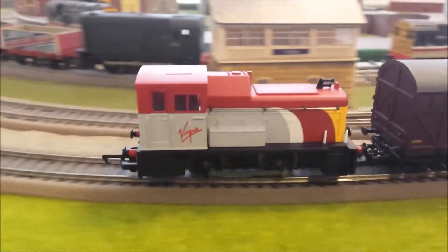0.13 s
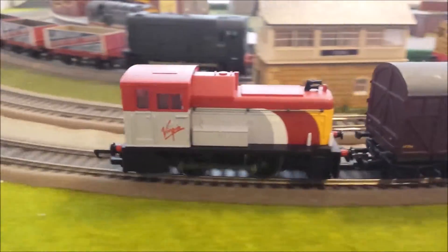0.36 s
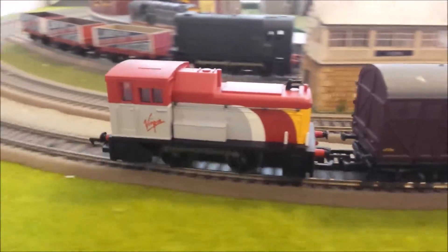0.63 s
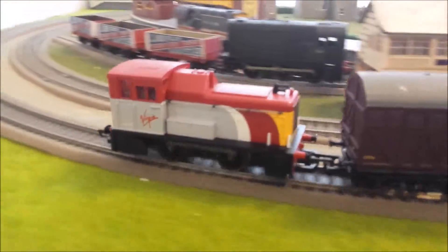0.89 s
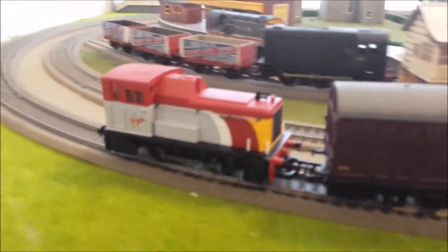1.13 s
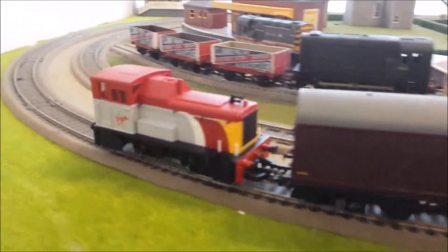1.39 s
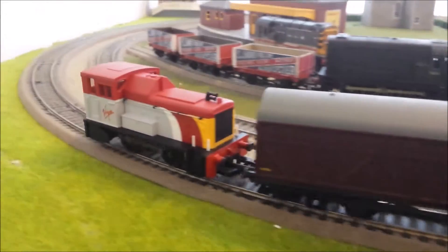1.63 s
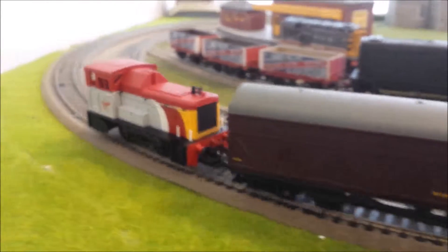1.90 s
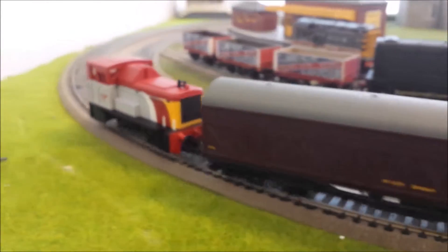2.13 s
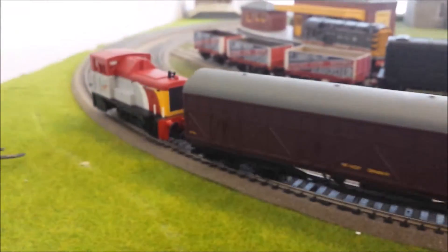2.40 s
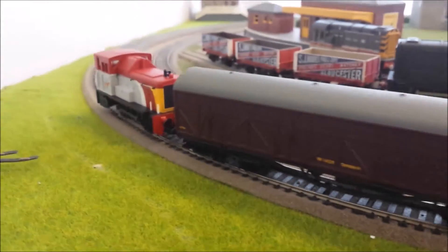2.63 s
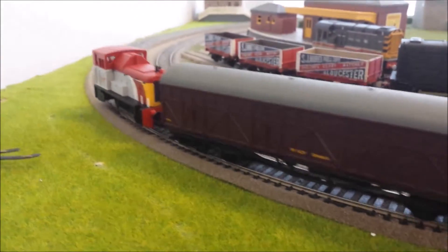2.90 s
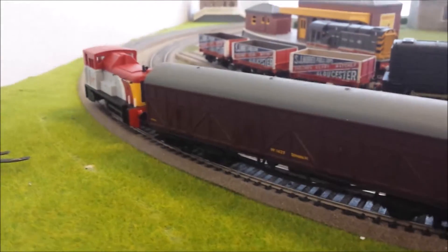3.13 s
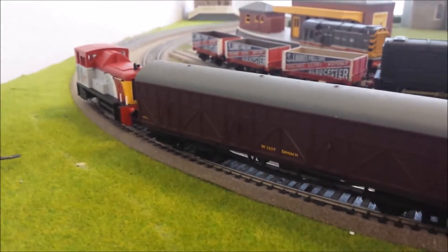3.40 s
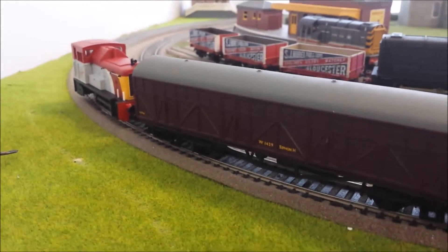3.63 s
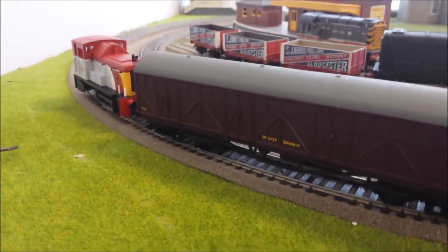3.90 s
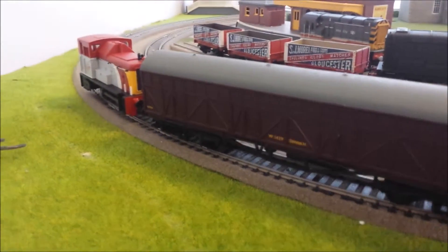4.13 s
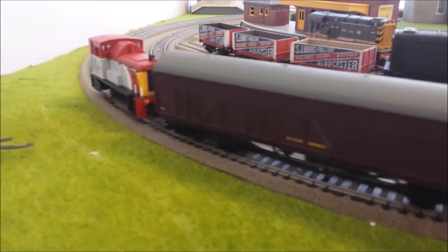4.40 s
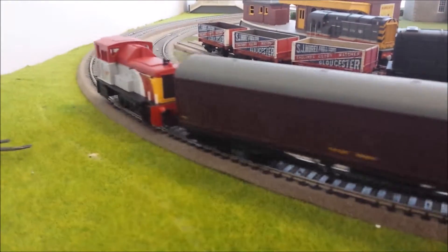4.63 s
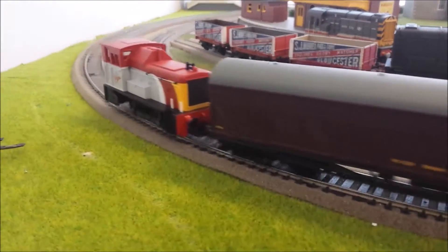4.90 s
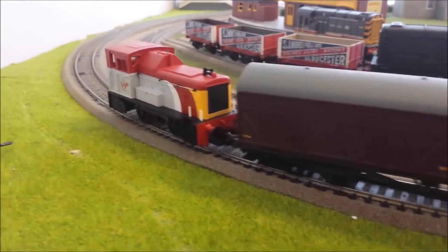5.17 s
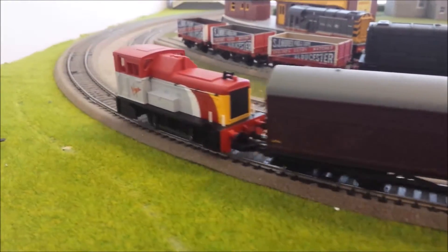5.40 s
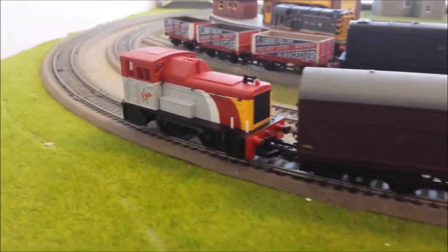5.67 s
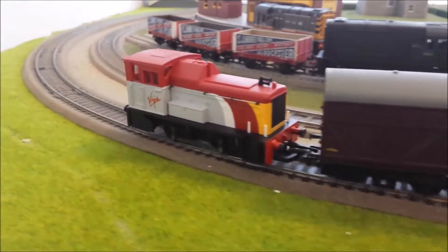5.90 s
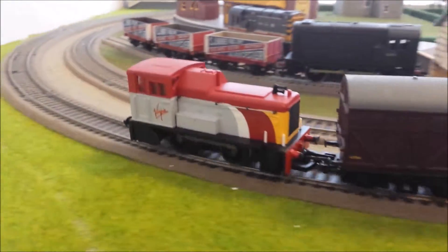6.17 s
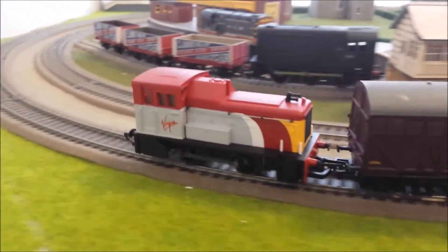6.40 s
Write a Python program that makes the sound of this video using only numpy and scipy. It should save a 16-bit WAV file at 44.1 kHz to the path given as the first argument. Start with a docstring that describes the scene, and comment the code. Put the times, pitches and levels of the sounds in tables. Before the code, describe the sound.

Close indoors, a small electric model locomotive whirs with gear chatter and brush hiss over a hollow board drone, with two sharp rail-joint pops. It recedes, slows and stops. In the quiet, a switch scrapes and clicks, loudest just before the restart. Couplings clatter, and the motor whirs away again, rising in pitch.

```python
"""Indoors, a wooden baseboard: a small model locomotive pushes a van round a curve, stops, pulls away again.
Shaft-gated noise drives board, shell and motor-can resonances: drone, gear clatter, brush hiss.
Gear ticks are struck shell modes, rail joints are three-lobed pops with board ring. In the pause a
controller clicks further off (noise bursts, a scrape), then the couplings slam (steel, plastic, board).
Two unlike microphone ports colour it all over a quiet room."""
import sys
import numpy as np
from scipy import signal
from scipy.fft import rfft, irfft, next_fast_len
from scipy.io import wavfile
from scipy.ndimage import map_coordinates

SR = 44100
rng = np.random.default_rng(int(sys.argv[2]) if len(sys.argv) > 2 else 0)


def unload_audio(sound):
    """Save the sound as a 16-bit wav file, at the path given as the first command line argument."""
    columns = np.transpose(np.atleast_2d(sound))
    # keep every value between -1 and 1, then stretch to whole-number steps
    steps = np.round(np.clip(columns, -1, 1) * 32767)
    wavfile.write(sys.argv[1], SR, steps.astype(np.int16))


def attenuation_scalar(level_db):
    """Turn a level in dB into a linear amplitude multiplier (20 dB per decade)."""
    decades = np.asarray(level_db, float) / 20
    return 10 ** decades


N = 287973
T = np.arange(N) / SR
SIZE = next_fast_len(N + SR // 2)
HZ = np.fft.rfftfreq(SIZE, 1 / SR)

# motor shaft, bridged across the stop: (time [s], speed [turns/s])
SHAFT_TPS = [(0, 41.3), (1.8, 37), (2.5, 32.7), (3.1, 21.3), (4.4, 34.6), (4.65, 36), (5.6, 35),
             (5.7, 39.5), (6.05, 42), (6.2, 43.6), (6.53, 55)]
# track effort, heard as board drone: (time [s], level [dB])
EFFORT_DB = [(0, -47.5), (0.85, -45), (1.6, -42.5), (2.0, -43.5), (2.4, -47.5), (2.88, -57), (3.08, -64.5),
             (3.3, -96), (4.36, -70.5), (4.46, -53), (4.58, -51.5), (4.72, -47), (5.96, -45), (6.53, -40.5)]
# engine to microphone: (time [s], distance [m])
DISTANCE_M = [(0, 0.38), (1, 0.53), (2, 0.88), (4.6, 0.8), (5.3, 0.65), (6.53, 0.76)]
# engine turned end-on in the curve: (time [s], share [0-1])
ASPECT_SHARE = [(0, 0), (1, 0.75), (3, 1), (4.7, 0.7), (5.2, 0.1)]
# baseboard resonances: (centre [Hz], width [Hz], gain [dB])
BOARD_MODES = [(66, 26, -12), (241.6, 72, -4.5), (348, 25, 0.5), (496, 102, -3), (668, 123, 1.5),
               (880, 308, -3)]
# strong low board mode: (centre [Hz], width [Hz], gain [dB])
BOOM_MODE = [(140.7, 44, -7)]
# board mode change when fully end-on, one per mode: (change [dB])
BOARD_END_ON_DB = [1.5, 1, 1, 2, -2, 1]
# board boom as wheels load it, rise and fall over 20 dB: (peak time [s], level [dB], rise [s], fall [s])
BOOM_SWELLS = [(0.91, -43, 0.12, 0.053), (1.61, -38, 0.027, 0.095), (1.98, -45, 0.12, 0.068),
               (2.39, -45, 0.15, 0.046), (2.61, -49, 0.07, 0.21), (2.885, -46.5, 0.011, 0.069),
               (4.46, -39.5, 0.036, 0.24), (6.28, -49, 0.31, 0.54)]
# plastic shell and gearbox resonances: (centre [Hz], width [Hz], gain [dB])
SHELL_MODES = [(592, 350, 3.5), (1420, 280, 10), (2020, 367, 7), (2700, 820, 0.5), (3747, 510, 4.5)]
# upper shell modes once the other tooth flank is loaded, one per mode: (change [dB])
PULLING_DB = [6.5, -3, -1, 4]
# brush hiss spectrum: (frequency [Hz], gain [dB])
BRUSH_TONE = [(3500, 1.5), (5000, -6), (6500, -10), (8600, 3), (9800, -2), (15000, 2)]
# motor can resonances: (centre [Hz], width [Hz], gain [dB])
CAN_MODES = [(6500, 400, -4), (7100, 380, 3), (7600, 260, 6.5), (8400, 230, 1)]
# can mode change when fully end-on, one per mode: (change [dB])
CAN_END_ON_DB = [0, -1, -5, 7]
# gear ticks, first of each run: (time [s], count [turns], level [dB], low knock [dB], favoured pitch [Hz])
GEAR_TICKS = [(0.078, 1, -35, -46, 2500), (0.176, 1, -36.5, -53, 1990), (0.2919, 1, -28.5, -44, 1900),
              (0.3491, 1, -33.5, -50, 1930), (0.5277, 1, -32.5, -41, 2150), (0.768, 1, -35, -46, 2570),
              (0.885, 1, -31.5, -39, 1930), (1.5933, 1, -29.5, -35.5, 1450), (1.8297, 1, -36, -39, 2240),
              (1.89, 1, -37.5, -53, 3400), (2.298, 1, -45, -64, 3700), (2.3429, 1, -31.5, -46.5, 2280),
              (2.515, 1, -41, -59, 2780), (2.645, 1, -60, -47, 2500), (2.737, 1, -52, -66, 2930),
              (2.94, 1, -51, -54, 2700), (3.084, 1, -55, -73, 2700), (3.244, 1, -56, -59.5, 2700),
              (4.683, 1, -37.5, -41, 2020), (4.706, 1, -36.5, -65, 3930), (5.091, 6, -38, -44.5, 3550),
              (5.174, 2, -35.5, -62, 2230), (5.281, 2, -41.5, -63, 1900), (5.369, 3, -41, -50, 1500),
              (5.52, 5, -63, -38, 1520), (5.604, 1, -41, -39, 3700), (5.682, 3, -29, -37, 2870),
              (5.806, 1, -35.5, -63, 1590), (6.022, 3, -46, -33, 1420), (6.1446, 4, -30, -31.5, 2630),
              (6.2775, 4, -32, -45, 1610), (6.5244, 1, -25.5, -51, 3580)]
# wheels over rail joints: (time [s], pop peak [dB], pulse width [ms], board ring [dB])
RAIL_JOINTS = [(0.9217, -13.5, 0.38, -47), (1.4584, -9, .26, -36), (4.7185, -25, 0.8, -26),
               (5.0275, -17, 0.48, -42)]
# coupling contacts: (time [s], hook clash [dB], body rattle [dB], rattle t60 [s], board thud [dB])
COUPLING_HITS = [(4.412, -63, -57, 0.049, -52), (4.446, -48.5, -33, 0.11, -37.5),
                 (4.452, -27, -33, 0.081, -41), (4.462, -33.5, -12.5, 0.021, -50),
                 (4.478, -62, -30.5, 0.096, -37), (4.504, -46, -37, 0.034, -40)]
# steel coupling hooks: (centre [Hz], width [Hz], gain [dB])
HOOK_MODES = [(5100, 4100, 0)]
# plastic van body: (centre [Hz], width [Hz], gain [dB])
VAN_MODES = [(670, 150, 6), (1043, 310, 1), (1900, 1200, -1), (3040, 740, 1.5)]
# controller clicks: (time [s], level [dB], t60 [s], thud [dB], rise [ms])
CONTROL_CLICKS = [(3.54, -39, 0.016, -70, 2.3), (3.818, -30.5, 0.031, -62, 8), (4, -48, 0.04, -73, 3),
                  (4.004, -16, 0.018, -75, 6.4)]
# click spectrum: (frequency [Hz], gain [dB])
CLICK_TONE = [(700, -13), (1500, 0), (2400, 7), (3500, 1.5), (5000, 1.5), (6500, -5.5), (10000, -13),
              (16000, -11)]
# controller housing: (centre [Hz], width [Hz], gain [dB])
HOUSING_MODES = [(500, 700, 0), (2300, 1200, 3), (5800, 2000, -2)]
# room decay: (frequency [Hz], t60 [s])
ROOM_T60_S = [(200, 0.25), (2000, 0.1), (10000, 0.077)]
# quiet room spectrum: (frequency [Hz], gain [dB])
AIR_TONE = [(20, -40), (55, -8), (90, -18.5), (130, -14), (210, -11), (300, -25), (900, -33), (5500, -37.5),
            (6800, -30.5), (8200, -39), (16000, -35)]
# microphone ports: (frequency [Hz], left gain [dB], right gain [dB])
PORT_TONE = [(29.8, 9, 10.5), (1256, -4, -4.5), (2310, 7.5, -3.5), (2960, 3, -3), (3700, -1, -2.5),
             (4990, 1, 4.5), (6070, -7, 12), (7760, -12.5, 9.5), (8750, -4, 9.5), (9260, -6, 4.5),
             (15200, -9, -1)]
# left-right likeness of noise: (frequency [Hz], correlation [0-1])
LIKENESS = [(40, 0.72), (140, 0.97), (300, 0.84), (600, 0.91), (1200, 0.38), (4000, 0.2), (12000, 0.079)]

GEARS_DB, BRUSHES_DB, BOOM_DB = -15.5, -7.5, -10  # re effort level; gears and brushes at 1 m
PULL_GEARS_DB, PULL_BRUSHES_DB = -2, -2  # change once the engine pulls
PULL_START_S = 4
SLACK_DB = 6.5  # unloaded gears clatter more as the shaft slows; full value at zero speed
TICK_EASE_DB = 1.7  # drop per repeat
SLIDE_S, SLIDE_DB, SLIDE_RISE_S, SLIDE_FALL_S = 3.83, -55, 0.15, 0.067  # direction switch scrape
CONTROL_PAN_DB = 3.5  # controller to the right: this much off left, onto right
AIR_DB = -64.5
LEFT_LAG_SAMPLES = 8
TOP_HZ = 15650


def unit(x):
    """Scales to rms 1, judged on the channel mean."""
    mean = np.mean(np.atleast_2d(x), axis=0)
    return x / np.sqrt(np.mean(mean ** 2) + 1e-20)


def along(points, hz, column=1):
    """Table values on a log-frequency axis."""
    table = np.transpose(points)
    return np.interp(np.log(hz + 1), np.log(table[0] + 1), table[column])


def filtered(x, response):
    """x through a response given on the HZ grid."""
    return irfft(rfft(x, SIZE) * response, SIZE)[..., :N]


def causal(gain_db):
    """Minimum-phase response with the given gain, by folding the cepstrum."""
    ceps = irfft(np.log(attenuation_scalar(gain_db)), SIZE)
    ceps[1:SIZE // 2] *= 2
    ceps[SIZE // 2 + 1:] = 0
    return np.exp(rfft(ceps))


def modes(table):
    """Sum of second-order resonances with alternating sign."""
    total = 0
    for k, (centre_hz, width_hz, gain_db) in enumerate(table):
        damping = 1j * HZ * width_hz
        total = total + (-1) ** k * attenuation_scalar(gain_db) * damping / (centre_hz ** 2 - HZ ** 2 + damping)
    return total


def wobble(rate_hz):
    """Smooth random curve, rate_hz knots a second."""
    knots = rng.standard_normal(int(N * rate_hz / SR) + 4)
    return map_coordinates(knots, [T * rate_hz])


def pair():
    """Two noises, alike in the bass and unlike in the treble."""
    turn = np.arccos(np.clip(along(LIKENESS, HZ), 0, 1)) / 2
    noise = rng.standard_normal((2, N))
    mid, side = filtered(noise, np.array([np.cos(turn), np.sin(turn)]))
    return np.array([mid + side, mid - side])


def gate(phase, share, sharp, scatter_db):
    """A swell at each whole phase, each of random size, over a steady part."""
    sizes = attenuation_scalar(scatter_db * rng.standard_normal(int(phase[-1]) + 1))
    u = sharp * (phase % 1)
    return 1 - share + share * sharp * sizes[phase.astype(int)] * u * np.exp(-u)


def bursts(times_s, levels_db, t60s, noise, rise_s):
    """Noise under a rounded rise and exponential decay, one per contact."""
    envelope = 0
    rises_s = np.broadcast_to(rise_s, len(times_s))
    for start_s, level_db, t60, rise in zip(times_s, levels_db, t60s, rises_s):
        age = np.clip(T - start_s, 0, 1)
        envelope = envelope + attenuation_scalar(level_db - 60 * age / t60) * (1 - np.exp(-(age / rise) ** 2))
    return noise * envelope


def impulses(times_s, sizes_db):
    """Single-sample blows."""
    return np.bincount(np.round(times_s * SR).astype(int), attenuation_scalar(sizes_db), N + SR)[:N]


def tent(peak_s, peak_db, rise_s, fall_s):
    """Swell straight in dB, 20 dB down rise_s before and fall_s after its peak."""
    return attenuation_scalar(peak_db - 20 * np.maximum((peak_s - T) / rise_s, (T - peak_s) / fall_s))


def shifting(x, table, port, changes_db, depth_db, rate_hz):
    """Resonances with given level changes, each fluttering independently."""
    spectrum = rfft(x, SIZE) * port
    total = 0
    for k, (mode, change_db) in enumerate(zip(table, changes_db)):
        ring = irfft(spectrum * modes([mode]), SIZE)[:, :N]
        total = total + (-1) ** k * attenuation_scalar(change_db + depth_db * wobble(rate_hz)) * ring
    return total


def struck(times_s, levels_db):
    """Blows on the upper shell modes, levels [blow, mode]; each ring swells and dies in its own band."""
    total = 0
    for mode_db, mode in zip(levels_db.T, SHELL_MODES[1:]):
        # cubed for the swell; the mode gain counts once
        response = modes([mode]) ** 3 / attenuation_scalar(2 * mode[2])
        total = total + filtered(impulses(times_s, mode_db), response)
    return total


def locomotive(port):
    """Board, gears and brushes gated by the shaft; silent while the train stands."""
    moving = np.clip(np.abs(T - 3.84) - .52, 0, .03) / .03
    effort_db = np.interp(T, *np.transpose(EFFORT_DB))
    airborne = attenuation_scalar(effort_db) / np.interp(T, *np.transpose(DISTANCE_M))
    pulls = T > PULL_START_S
    speed_tps = np.interp(T, *np.transpose(SHAFT_TPS))
    aspect = np.interp(T, *np.transpose(ASPECT_SHARE))
    turns = np.cumsum(speed_tps * (1 + 0.014 * wobble(8.7))) / SR
    mesh = gate(turns, share=0.25, sharp=4.8, scatter_db=4.5)  # one tight tooth a turn
    gear_gain = attenuation_scalar(GEARS_DB + PULL_GEARS_DB * pulls)
    brush_gain = attenuation_scalar(BRUSHES_DB + PULL_BRUSHES_DB * pulls)
    engine = gear_gain * gears(turns, mesh, speed_tps, pulls, port) + brush_gain * brushes(turns, aspect, port)
    return moving * (board(mesh, effort_db, aspect, port) + airborne * engine)


def board(mesh, effort_db, aspect, port):
    """Gear-gated noise drones in the board modes; the low mode also booms in swells as wheels load it."""
    changes_db = np.outer(BOARD_END_ON_DB, aspect)
    drone = unit(shifting(mesh * pair(), BOARD_MODES, port, changes_db, depth_db=2.2, rate_hz=9))
    boom = unit(filtered(pair(), modes(BOOM_MODE) ** 2))
    boom_gain = attenuation_scalar(effort_db + BOOM_DB) + sum(tent(*row) for row in BOOM_SWELLS)
    return attenuation_scalar(effort_db) * drone + boom_gain * boom


def gears(turns, mesh, speed_tps, pulls, port):
    """Tooth- and pole-gated noise in the shell, plus chatter; louder as the unloaded shaft slows."""
    poles = gate(3 * turns, share=0.4, sharp=0.75, scatter_db=5)  # three commutator gaps a turn
    changes_db = np.outer(PULLING_DB, pulls)
    noise = mesh * poles * pair()
    whirr = unit(shifting(noise, SHELL_MODES[1:], port, changes_db, depth_db=2.5, rate_hz=14))
    rattle = attenuation_scalar(2.5) * unit(filtered(chatter(turns), port))
    slack_db = SLACK_DB * (1 - speed_tps / SHAFT_TPS[0][1]) * ~pulls
    return (whirr + rattle) * attenuation_scalar(slack_db)


def chatter(turns):
    """Loose teeth strike near every third of a turn, in clusters, each on other modes with a low knock."""
    strike_s = np.flatnonzero(np.diff(np.floor(3 * turns))) / SR
    draw = rng.standard_normal((len(strike_s), len(SHELL_MODES) + 1))
    loose_db = 3 * wobble(9)[np.round(strike_s * SR).astype(int), None]
    load_db = np.outer(strike_s > PULL_START_S, PULLING_DB) - 2 * np.arange(len(PULLING_DB))
    strike_s = np.abs(strike_s + .002 * draw[:, 0])
    level_db = np.minimum(loose_db + 6 * draw[:, 1:2] + 6 * draw[:, 2:], 14) + load_db
    knock = filtered(impulses(strike_s, level_db[:, 0] - 2), modes(SHELL_MODES[:1]) ** 2)
    return struck(strike_s, level_db) + knock


def brushes(turns, aspect, port):
    """Hiss pulsed by three commutator gaps a turn, direct and through the motor can."""
    wear = attenuation_scalar(1.23 * np.cos(2 * np.pi * turns))  # commutator runs out of true
    hiss = gate(3 * turns, share=0.8, sharp=2.2, scatter_db=1.5) * wear * pair()
    changes_db = np.outer(CAN_END_ON_DB, aspect)
    can = shifting(hiss, CAN_MODES, port, changes_db, depth_db=1.9, rate_hz=7)
    direct = filtered(hiss, attenuation_scalar(along(BRUSH_TONE, HZ)) * port)
    return unit(direct + attenuation_scalar(7.5) * can)


def ticks():
    """A catching tooth rings the shell modes nearest its pitch, with a duller knock under it."""
    shaft = np.transpose(SHAFT_TPS)
    rows = []
    for start_s, count, level_db, low_db, pitch_hz in GEAR_TICKS:
        for k in range(round(count)):
            ease_db = TICK_EASE_DB * k
            rows.append((start_s + k / np.interp(start_s, *shaft), level_db - ease_db, low_db - ease_db, pitch_hz))
    tick_s, level_db, low_db, pitch_hz = np.transpose(rows)
    octaves = np.abs(np.log2(pitch_hz[:, None] / np.transpose(SHELL_MODES)[0, 1:]))  # from each mode
    scatter_db = 2.6 * rng.standard_normal(octaves.shape)
    ring = struck(tick_s, level_db[:, None] + 29 - 19 * octaves + scatter_db)
    t60s = np.full(len(tick_s), .015)
    grit = bursts(tick_s, level_db + 9.5, t60s, rng.standard_normal(N), rise_s=0.0031)
    rattle = filtered(grit, modes(SHELL_MODES[1:]))
    soft = causal(-10 * np.log10(1 + (HZ / 4500) ** 8))  # plastic on plastic: no high treble
    knock = filtered(impulses(tick_s + 0.00127, low_db + 35.0), modes(SHELL_MODES[:1]) ** 2)
    return ring + filtered(rattle, soft) + knock


def joints():
    """A wheel drops into the gap: one pointed three-lobed pop, and the board rings."""
    pop, point = np.zeros(N), 1.4
    for joint_s, peak_db, width_ms, _ in RAIL_JOINTS:
        v = np.clip(np.abs(T - joint_s) / (width_ms / 1000), 0, 30) ** point
        pop -= attenuation_scalar(peak_db) * (1 - point * v) * np.exp(-v)
    joint_s, _, _, ring_db = np.transpose(RAIL_JOINTS)
    t60s = np.full(len(joint_s), .16)
    rumble = bursts(joint_s, ring_db + 12.0, t60s, rng.standard_normal(N), rise_s=0.00023)
    blow = impulses(joint_s, ring_db + 13)
    return pop + filtered(rumble + blow, modes(BOARD_MODES[1:] + BOOM_MODE))


def couplings():
    """The slack runs out: hooks clash, plastic bodies rattle and the board is jolted."""
    hit_s, clash_db, body_db, t60s, thud_db = np.transpose(COUPLING_HITS)
    steel = unit(filtered(rng.standard_normal(N), modes(HOOK_MODES) ** 2))
    grain = attenuation_scalar(1.8 * wobble(250)) * rng.standard_normal(N)
    plastic = unit(filtered(grain, modes(VAN_MODES) / (1 + (HZ / 4400) ** 4)))
    clash = bursts(hit_s, clash_db, np.full(len(hit_s), .035), steel, rise_s=0.0019)
    rattle = bursts(hit_s, body_db, t60s, plastic, rise_s=0.0013)
    thud = filtered(impulses(hit_s, thud_db + 37), modes(BOARD_MODES[1:] + BOOM_MODE))
    return clash + rattle + thud


def controller():
    """Thin plastic clicks over a soft thud in the baseboard, and one grainy switch scrape in the housing."""
    click_s, level_db, t60s, thud_db, rise_ms = np.transpose(CONTROL_CLICKS)
    thin = unit(filtered(rng.standard_normal(N), attenuation_scalar(along(CLICK_TONE, HZ))))
    click = bursts(click_s - .002, level_db, t60s, thin, rise_ms / 1000)
    push = bursts(click_s, thud_db + 35, 3 * t60s, rng.standard_normal(N), rise_s=0.0083)
    thud = filtered(push, modes(BOARD_MODES[1:3]))
    housed = filtered(rng.standard_normal((1, N)), modes(HOUSING_MODES))
    no_change_db = np.zeros(len(HOUSING_MODES))
    grain = unit(shifting(housed, HOUSING_MODES, 1, no_change_db, depth_db=4, rate_hz=80)[0])
    scrape = tent(SLIDE_S, SLIDE_DB, SLIDE_RISE_S, SLIDE_FALL_S) * grain
    return click + thud + scrape


def room(x):
    """Noise tail, separate at each port, each frequency dying at its own speed."""
    hz, t, z = signal.stft(rng.standard_normal((2, SR // 2)), SR, nperseg=256)
    decay = attenuation_scalar(-60 * t / along(ROOM_T60_S, hz)[:, None])
    tail = signal.istft(z * decay, SR, nperseg=256)[1]
    late = np.pad(x, (150, 0))[None]  # 150 samples delay
    return signal.fftconvolve(late, tail / np.linalg.norm(tail[0]), axes=1)[:, :N]


def air(port):
    """Room rumble and microphone hiss; the ports colour it only in part."""
    return attenuation_scalar(AIR_DB) * unit(filtered(pair(), attenuation_scalar(along(AIR_TONE, HZ)) * np.abs(port) ** 0.35))


def ports():
    """Each port has its own cavity colour; the left one is reached a little later."""
    lag = np.exp(-2j * np.pi * HZ * LEFT_LAG_SAMPLES / SR)
    left = causal(along(PORT_TONE, HZ, column=1)) * lag
    right = causal(along(PORT_TONE, HZ, column=2))
    return np.array([left, right])


def scene():
    """Mixes train, hits and air; near hits mostly direct, the controller with much more room."""
    port = ports()
    near = ticks() + joints() + couplings()
    far = controller()
    panned = attenuation_scalar([[-CONTROL_PAN_DB], [CONTROL_PAN_DB]]) * far
    hits = near + panned + room(attenuation_scalar(-10.5) * near + attenuation_scalar(-3.0) * far)
    return locomotive(port) + filtered(hits, port) + air(port)


def low_pass(x):
    """Removes everything above the highest recorded frequency."""
    return signal.sosfilt(signal.butter(12, 16620, fs=SR, output="sos"), x)


def record(dry):
    """The phone's band limit: nothing from TOP_HZ up."""
    mix = filtered(dry, HZ < TOP_HZ)
    return low_pass(mix)


dry = scene()
out = record(dry)
unload_audio(out)
```